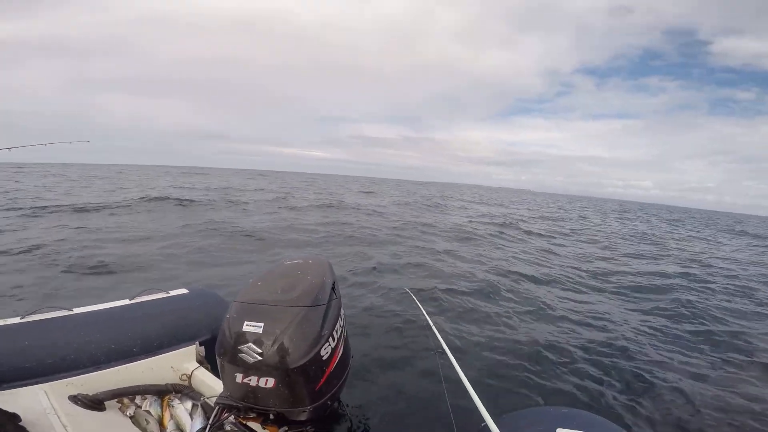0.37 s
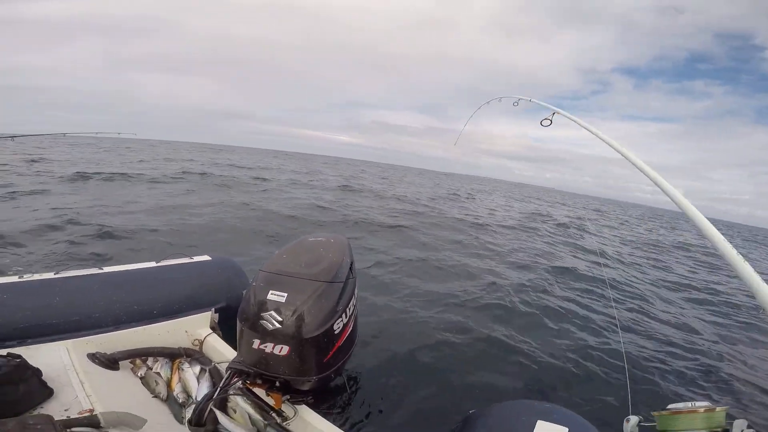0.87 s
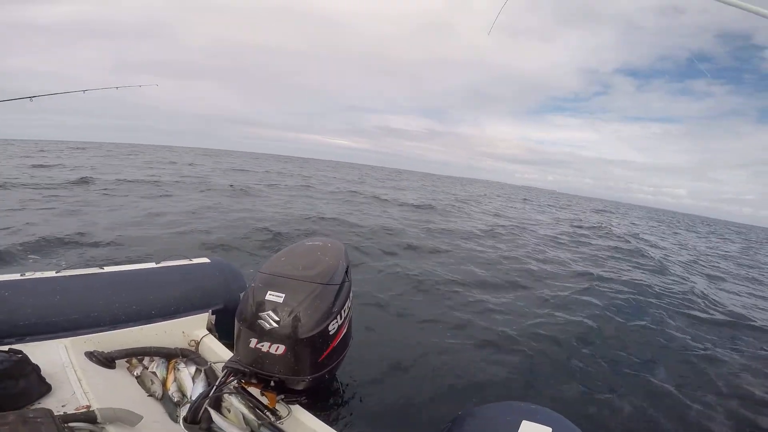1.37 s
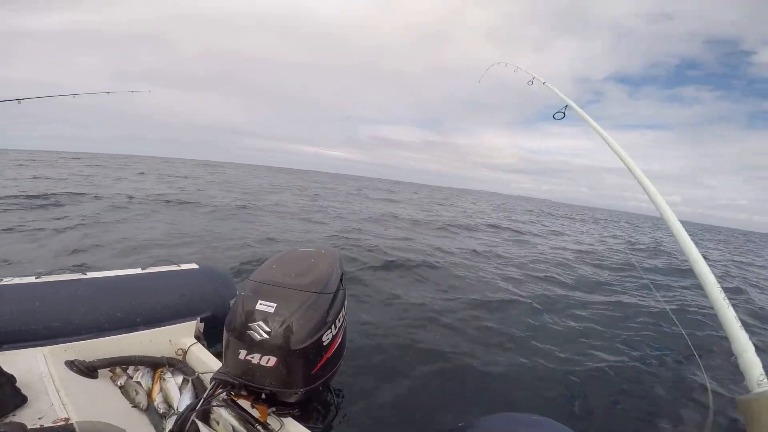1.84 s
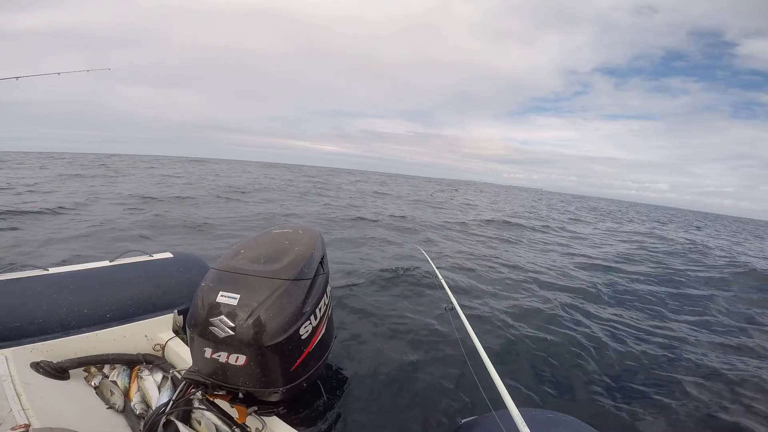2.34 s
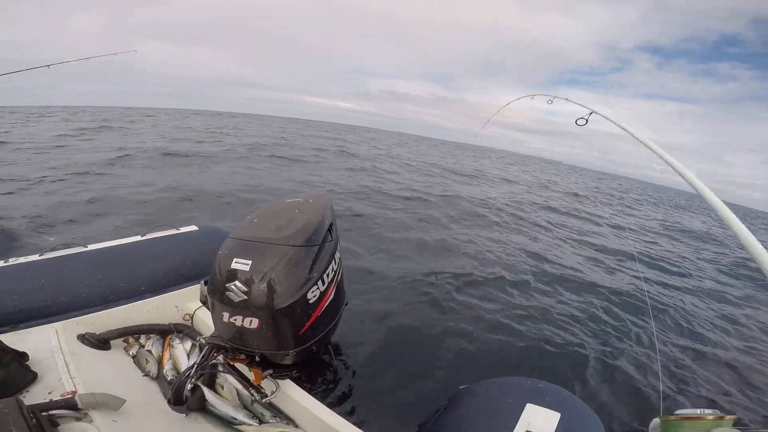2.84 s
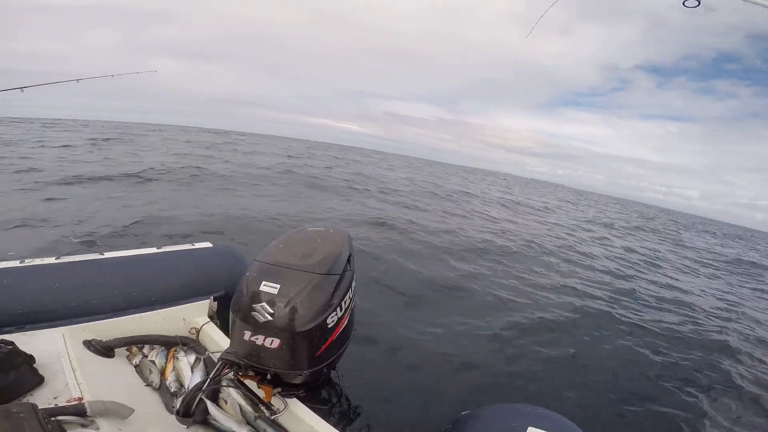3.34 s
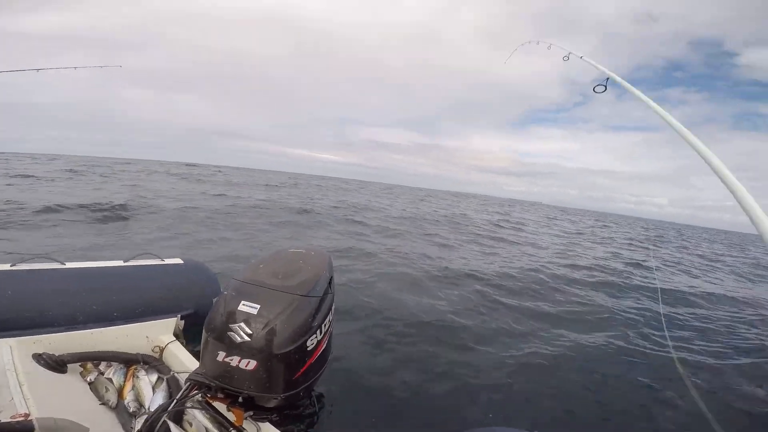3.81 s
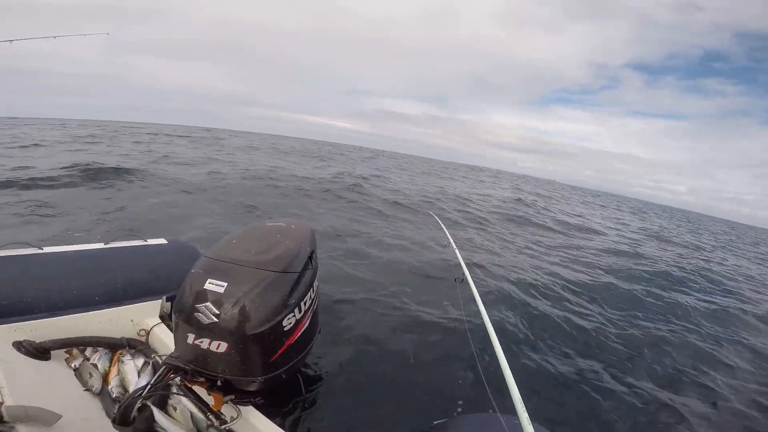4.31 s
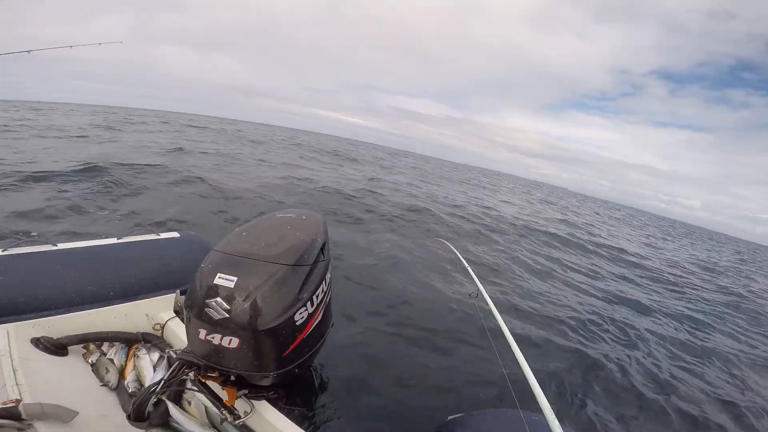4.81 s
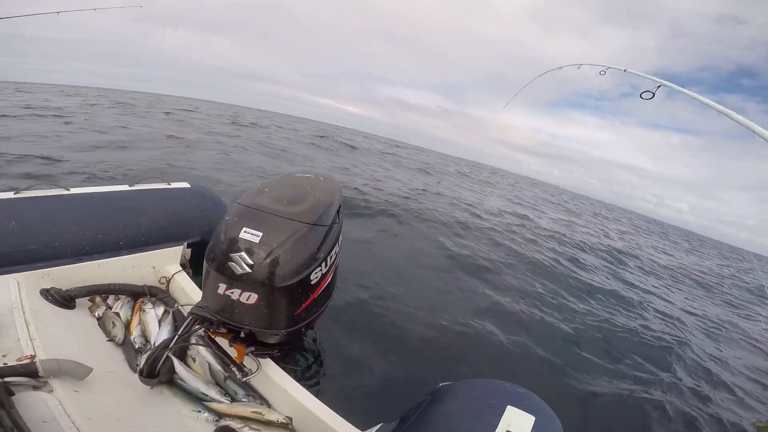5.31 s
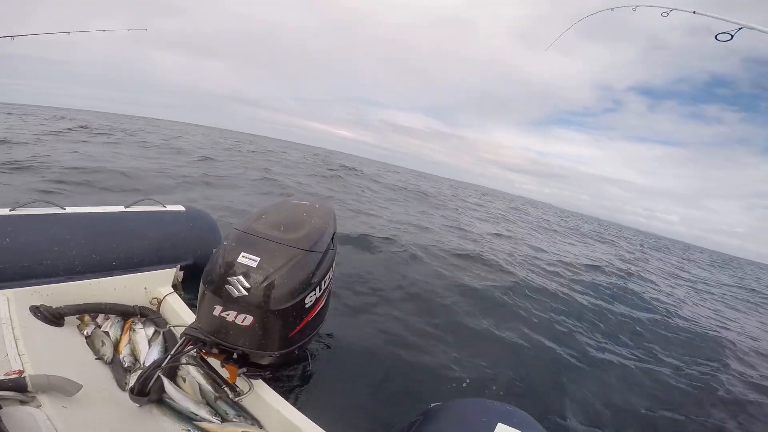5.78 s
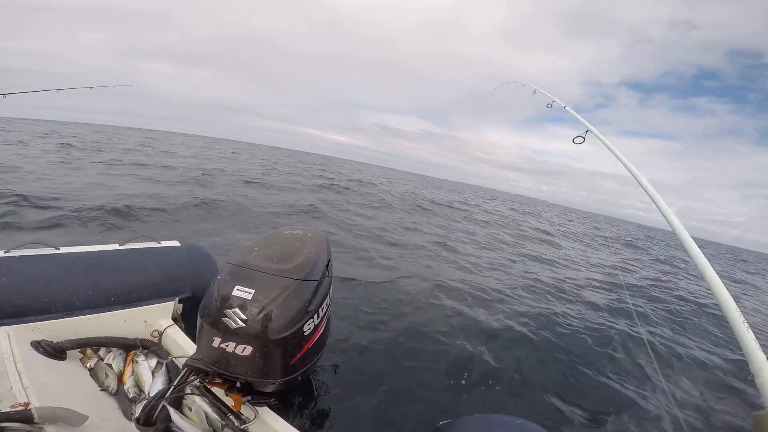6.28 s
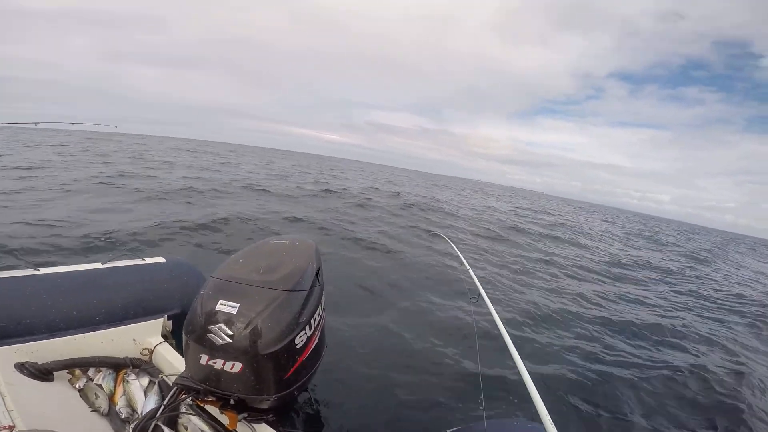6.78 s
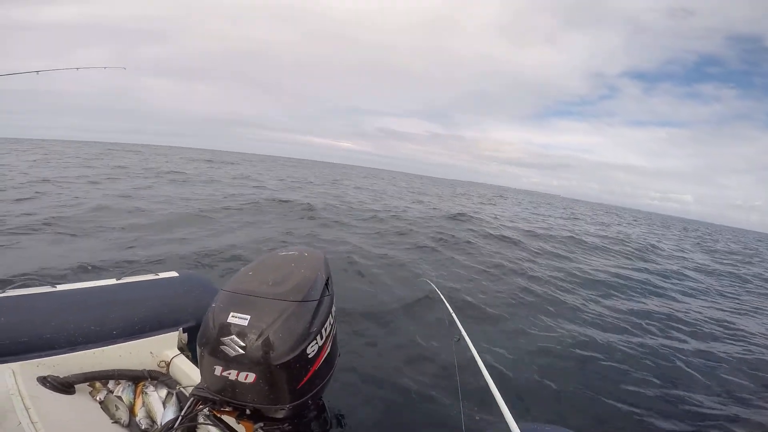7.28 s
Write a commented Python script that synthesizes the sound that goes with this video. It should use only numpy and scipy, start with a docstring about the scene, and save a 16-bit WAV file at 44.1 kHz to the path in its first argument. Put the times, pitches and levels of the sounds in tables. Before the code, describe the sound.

Close, muffled single-channel sound from a small boat at sea. Deep uneven wind throbs dominate, over faint hiss and a very thin high whine. Light water laps and gurgles along the hull. A fishing reel turns in short whirring spells with small squeaks, dull rod and reel knocks, and bright ticks of line and guides. Around four seconds water stirs; just before six a bubbling slap is the liveliest moment, then it calms.

```python
"""Small boat rocking at sea

Wind eddies press on a housed microphone: shaped noise gives a deep throb, a drone and a lumpy flutter.
Water laps, gurgles and sprays along the hull as coloured noise and decaying tones of rising pitch.
A fishing reel wound in short turns is noise through resonances, with warbling squeaks; parts knock and
tick as damped modes. Droplets and reel snap drily; electronics add a steady hiss and faint sine tones."""
import sys
import numpy as np
from scipy import signal
from scipy.fft import rfft, irfft, next_fast_len
from scipy.io import wavfile
from scipy.ndimage import uniform_filter1d, map_coordinates

SR = 44100
rng = np.random.default_rng(int(sys.argv[2]) if len(sys.argv) > 2 else 0)


def invert_db(level):
    """Linear amplitude ratio for a level in decibels (20 dB per decade), elementwise."""
    return 10 ** (np.asarray(level, dtype=float) / 20)


def store_pcm(level_fs):
    """Save levels as 16-bit WAV."""
    pcm = np.round(np.clip(level_fs, -1, 1) * 32767).astype(np.int16)
    wavfile.write(sys.argv[1], SR, np.atleast_2d(pcm).T)


N = 336924  # samples


def unit(x):
    """Normalization of a signal to rms 1."""
    return x / np.sqrt(np.mean(x ** 2) + 1e-20)


def curves(rows):
    """Linear interpolation in time: one value per sample for each column after t."""
    s, *cols = np.transpose(rows)
    return [np.interp(np.arange(N) / SR, s, c) for c in cols]


def wobble(rate):
    """Slow random modulation: a smooth curve through random knots, rate of them per second."""
    knots = rng.standard_normal(int(N * rate / SR) + 4)
    return map_coordinates(knots, [np.arange(N) * rate / SR])


def filtered(x, response):
    """Linear filtering: the spectrum of x times a complex response of frequency."""
    m = next_fast_len(len(x) + 8192)
    return irfft(rfft(x, m) * response(np.fft.rfftfreq(m, 1 / SR)), m)[:len(x)]


def colour(spectrum):
    """Spectral shaping: gain against frequency from (f/Hz, level/dB) points, closed at both ends."""
    hz, db = np.transpose(spectrum)
    return lambda f: invert_db(np.interp(np.log(f + 1), np.log(hz + 1), db, -120, -120))


def octave_band(hz, octaves):
    """Band-pass response, Gaussian in log frequency, with its standard deviation in octaves."""
    return lambda f: np.exp(-.5 * (np.log2((f + 1) / hz) / octaves) ** 2)


def rush(spectrum, patchy_db):
    """Turbulence noise: coloured, rms 1, with random gain in patches of time and frequency."""
    z = signal.stft(rng.standard_normal(N + 512), nperseg=512)[2]
    field = uniform_filter1d(uniform_filter1d(rng.standard_normal(z.shape), 6, 0), 8, 1)
    x = signal.istft(z * invert_db(patchy_db * unit(field)), nperseg=512)[1][:N]
    return unit(filtered(x, colour(spectrum)))


def add(track, s, sound):
    """Superposition of a sound on the track from time s."""
    part = track[max(round(s * SR), 0):][:len(sound)]
    part += sound[:len(part)]


def ring(modes, t):
    """Modal decay: a sum of damped sines, at new strengths for each blow, scaled to peak 1."""
    x = 0
    for hz, db, t60 in modes:
        level_db = db + rng.normal(0, 0.74) - 60 * t / t60
        x = x + invert_db(level_db) * np.sin(2 * np.pi * hz * t)
    return x / np.abs(x).max()


def bubble(hz, t60, t, rise):
    """Bubble resonance: a soft onset, then a decay whose pitch climbs as it nears the surface."""
    onset = 1 - np.exp(-t * hz / 1.1)
    return invert_db(-60 * t / t60) * onset * np.sin(2 * np.pi * hz * t * (1 + rise * t / t60))


def wind():
    """Eddy pressure on the housing: a low-passed throb under a drone and a lumpy flutter."""
    # uneven level of the low wind throb: t/s, level/dB
    throb_levels = [(0.0, -30.5), (0.06, -34.5), (0.13, -62), (0.21, -31), (0.34, -43), (0.36, -38),
                    (0.79, -32), (0.94, -41.5), (1.7, -38.5), (2.04, -22), (2.11, -33.5), (2.23, -24.5),
                    (2.3, -30.5), (2.47, -27), (2.49, -34.5), (3.15, -32.5), (3.21, -42.5), (3.76, -33),
                    (3.87, -24), (4.0, -34), (4.06, -22.5), (4.15, -27.5), (4.21, -23), (4.28, -40),
                    (4.32, -27), (4.53, -32), (4.66, -47.5), (4.83, -31.5), (4.87, -45), (4.89, -35),
                    (6.43, -44), (6.81, -34.5), (6.85, -23.5), (6.89, -46), (6.98, -28), (7.08, -44.5),
                    (7.25, -27.5), (7.34, -54), (7.38, -36.5), (7.55, -44.5), (7.6, -31), (7.64, -44)]
    # lighter eddies: t/s, drone level/dB, flutter level/dB
    eddies = [(0, -37, -57.5), (.1, -48.5, -64), (1.3, -47, -63.5), (1.66, -48.5, -54), (2.02, -41.5, -58),
              (2.3, -41.5, -60.5), (2.68, -48, -59.5), (3.02, -43, -58), (3.59, -46, -64), (3.8, -42, -57),
              (4.32, -43.5, -57), (4.7, -47, -60), (5.4, -48, -61), (5.8, -48, -62.5), (6.2, -46.5, -60),
              (6.47, -49, -64.5), (7.04, -46, -61.5), (7.64, -52, -62)]
    # noise spectra: f/Hz, density/dB per Hz
    throb_spectrum = [(6, -29), (12, -3), (27, 1.5), (42, 2.5), (54, -7), (68, -18.5), (90, -60)]
    drone_spectrum = [(35, -31), (52, -1), (65, -12), (85, -16), (120, -41.5), (150, -48)]
    flutter_spectrum = [(53, -37), (90, -6), (146, -6.5), (248, -12), (476, -25.5), (700, -24.5),
                        (910, -32), (1540, -120)]
    eddy_db, eddies_per_s = 0.5, 12  # random swing of the throb
    throb_db, = curves(throb_levels)
    drone_db, flutter_db = curves(eddies)
    throb = rush(throb_spectrum, patchy_db=0.5)
    running = np.sqrt(np.abs(uniform_filter1d(uniform_filter1d(throb ** 2, 2000), 2000)))
    even = throb / (running + 0.3)  # the noise's own swings are evened out
    throb = invert_db(throb_db) * unit(invert_db(eddy_db * wobble(eddies_per_s)) * even)
    throb = filtered(throb, lambda f: 1 / np.sqrt(1 + (f / 62) ** 10))  # a low-pass keeps the slow throb
    drone = invert_db(drone_db) * rush(drone_spectrum, patchy_db=-1.5)
    lumps = invert_db(1.78 * wobble(13) + 1.4 * wobble(35))
    flutter = unit(lumps * rush(flutter_spectrum, patchy_db=-1.1))
    return throb + drone + invert_db(flutter_db) * flutter


def water():
    """Superposition of lapping, fizz, gurgles and spray."""
    # water along the hull: t/s, lapping level/dB
    laps = [(0.0, -69.5), (0.55, -65), (1.06, -73), (1.53, -73), (1.81, -66.5), (2.26, -63), (2.57, -66),
            (3.04, -68), (3.51, -74.5), (3.74, -67), (3.94, -57), (4.21, -62), (4.85, -67.5), (5.7, -64.5),
            (5.85, -53.5), (6.0, -60), (6.38, -67), (7.08, -65), (7.64, -76)]
    lap_db, = curves(laps)
    near = np.zeros(N)
    gurgles(near)
    spray(near)
    return lapping(lap_db) + fizz(lap_db) + near


def lapping(lap_db):
    """Turbulent wash: coloured noise joined by a dense swarm of small bubble resonances."""
    # spectrum of the noise: f/Hz, density/dB per Hz
    spectrum = [(300, 8.5), (600, -5.5), (1000, 3), (1500, 4), (2500, -1), (5000, -24), (9000, -28),
                (14000, -48)]
    swarm, t = np.zeros(N), np.arange(2600) / SR
    for when, pitch, size in rng.random((1800, 3)):
        hz = 1200 * 3.6 ** pitch
        strength = (1.015 - size) ** -.26  # a few are much louder
        add(swarm, when * N / SR, strength * bubble(hz, 48 / hz, t, rise=0.13))
    even = unit(invert_db(1.8 * wobble(30)) * rush(spectrum, patchy_db=1.3))
    return invert_db(lap_db) * (invert_db(-2.5) * even + invert_db(-4.5) * unit(swarm))


def fizz(lap_db):
    """Amplitude-modulated noise: fine crackling that follows the lapping and the wound line."""
    # spectrum: f/Hz, density/dB per Hz
    spectrum = [(3500, -20), (5000, 0), (7000, 1), (10000, -1.5), (13000, -9), (15000, -44)]
    quiet_fizz_db, quiet_lap_db, grows = -79, -70.5, 0.5  # grows in dB per dB of lapping
    shed_db = -22  # spray flung off the wound line, under the winding level
    fizz_db = quiet_fizz_db + grows * (lap_db - quiet_lap_db)
    crackle = rng.standard_normal(N) * invert_db(3 * wobble(300) + 2.8 * wobble(35))
    level = np.hypot(invert_db(fizz_db), invert_db(winding() + shed_db))
    return level * unit(filtered(crackle, colour(spectrum)))


def gurgles(track):
    """Bubble resonance in torn water: the loudest single bubbles, each in a decaying noise band."""
    # bubbles: t/s, level before the swell and fade/dB, f/Hz
    bubbles = [(.621, -51, 1030), (0.638, -48, 1650), (0.646, -49, 1080), (.647, -49, 6150),
               (.649, -49, 2000), (.654, -50, 2550), (0.666, -46, 1850), (.662, -53, 1260),
               (.871, -51, 3600), (0.876, -50, 1190), (0.921, -51, 1790), (.949, -44.5, 1960),
               (1.074, -50.5, 1760), (1.563, -51, 1430), (1.726, -49.5, 2340), (1.968, -48, 6100),
               (2.003, -50, 6000), (2.035, -54, 5860), (2.05, -46, 1490), (3.222, -55, 1370),
               (3.253, -53, 2330), (3.335, -46.5, 1310), (3.762, -50, 6300), (2.669, -57, 2040),
               (3.872, -46, 3480), (4.124, -43, 1850), (4.14, -45, 3200), (4.398, -55, 1440),
               (4.545, -53, 1400), (4.637, -53, 2050), (4.646, -46, 1780), (4.798, -51, 1410),
               (5.269, -52, 2300), (5.4, -51, 1690), (5.463, -47, 1765), (5.643, -42, 1620),
               (5.715, -46, 2200), (5.715, -50, 1660), (5.765, -44, 1650), (5.773, -42, 2400),
               (5.786, -44, 3880), (5.812, -55, 3600), (5.824, -46.5, 1720), (5.845, -38, 1170),
               (5.846, -42, 1590), (5.859, -47, 1060), (5.916, -37.5, 1495), (5.934, -43, 1100),
               (5.964, -44, 1220), (5.965, -45, 370), (5.99, -45, 423), (6.018, -48, 330),
               (6.022, -41, 1340), (6.114, -43, 775), (6.292, -54, 2900), (6.466, -51, 1430),
               (6.531, -51, 1050), (6.634, -50, 1630), (6.668, -50, 1730), (6.72, -49, 3680),
               (7.527, -53, 2330)]
    longest_s, cycles = 0.052, 79  # time scale of the decay; small bubbles take this many cycles
    hold = 0.15  # share of the time scale in which the bubble swells slightly before it fades
    splat_db, splat_octaves = -13, .35  # torn water around each bubble
    t = np.arange(SR // 10) / SR
    for s, db, hz in bubbles:
        # churning water breaks up the ring
        ragged = invert_db(np.interp(t, t[::110], rng.normal(0, 1.2, len(t[::110]))))
        t60 = min(longest_s, cycles / hz)
        swell_db = 138 * np.minimum(t / t60, hold) - 60 * t / t60 - 60 * hold
        tone = ragged * invert_db(swell_db) * bubble(hz, t60, t, rise=0.047)
        splat = unit(filtered(rng.standard_normal(len(t)), octave_band(hz, splat_octaves)))
        add(track, s, invert_db(db) * (tone + invert_db(splat_db - 60 * t / t60) * splat))


def spray(track):
    """Random superposition: bursts of band noise and droplets of many pitches."""
    # bursts: t of the crest/s, level at the crest/dB, centre f/Hz, length of the fall/s
    bursts = [(0.619, -56, 1310, 0.012), (0.653, -58, 1500, 0.014), (.662, -59, 3400, 0.014),
              (0.623, -60, 3300, .006), (0.726, -59, 1020, 0.0065), (0.925, -59, 2590, 0.0054),
              (1.833, -77, 6900, 0.036), (2.058, -66.5, 7560, .04), (2.13, -67, 6000, .008),
              (2.277, -59, 2520, 0.0033), (2.994, -57, 1620, 0.0052), (3.842, -74, 5970, .015),
              (3.927, -60.5, 7760, .004), (3.955, -65, 5600, 0.0043), (3.995, -64, 5470, 0.0068),
              (4.066, -57, 4200, 0.0071), (4.1, -68, 8000, 0.027), (4.219, -65, 5800, .006),
              (3.032, -62, 824, 0.033), (4.124, -53.5, 3000, 0.012), (4.176, -54, 3020, 0.0084),
              (4.446, -56.5, 2440, 0.0075), (5.158, -61, 5070, 0.0067), (5.188, -58, 5570, 0.0043),
              (5.2, -55, 9800, 0.014), (5.21, -54, 6000, 0.01), (5.422, -57, 2860, 0.011),
              (5.718, -59, 3050, 0.0035), (5.8, -52.5, 5930, 0.0048), (5.852, -64, 10000, 0.0018),
              (5.762, -63, 6500, 0.0046), (5.679, -55, 6100, .003), (5.808, -57, 1460, 0.013),
              (5.863, -49, 1980, 0.0056), (5.939, -50, 2400, 0.0076), (5.961, -56, 4000, 0.0039),
              (5.865, -56, 1500, 0.018), (5.88, -57, 925, .01), (6.654, -66, 1660, 0.018),
              (6.09, -55.5, 3730, 0.007), (6.346, -65, 520, 0.028)]
    widest_hz, widest_octaves, narrows = 1500, 0.817, 0.217  # narrows in octaves per octave away
    t, drop_t = np.arange(-SR // 5, SR // 5) / SR, np.arange(900) / SR
    for s, db, hz, length in bursts:
        octaves = widest_octaves - narrows * abs(np.log2(hz / widest_hz))
        bell = octave_band(hz, octaves)
        noise = filtered(rng.standard_normal(len(t)), lambda f: bell(f) / (1 + (f / 13000) ** 8))
        drops = np.zeros(len(t))
        for when, size, pitch in zip(*rng.random((2, 200)), rng.standard_normal(200)):
            drop_hz = min(hz * 2 ** (octaves * pitch), 13000)
            drop = (1 - size) ** -.12 * bubble(drop_hz, 30 / drop_hz, drop_t, rise=0.17)
            add(drops, when * len(t) / SR, drop)
        burst = unit(noise) + 1.1 * unit(drops)
        spread = np.where(t < 0, 0.5 * length, length)  # quick to come, slower to go
        add(track, s + t[0], invert_db(db) * np.exp(-.5 * (t / spread) ** 2) * unit(burst))


def snaps():
    """Heavily damped resonance: short dry snaps of droplets and chattering reel."""
    # snaps: t/s, level before the soft onset/dB, f/Hz
    clicks = [(.632, -54, 2100), (.655, -56, 1500), (.672, -53, 2300), (3.897, -46, 2300),
              (4.019, -56, 3900), (4.2983, -37.5, 2630), (4.448, -41, 3380), (5.186, -54, 5600),
              (5.257, -56, 4000), (5.6652, -31, 2190), (5.666, -42, 1500), (5.659, -52, 4200),
              (5.667, -54, 4200), (5.711, -56, 4150), (5.722, -53, 4200), (5.734, -47, 1960),
              (5.838, -52, 2200), (5.872, -38, 1590), (5.895, -58, 1900), (5.972, -46, 2400),
              (6.09, -43, 1560), (6.13, -49, 1800), (6.515, -39, 3520), (6.524, -41, 3500),
              (6.533, -46, 3500), (6.543, -54, 3450)]
    out, t = np.zeros(N), np.arange(SR // 10) / SR
    for s, db, hz in clicks:
        add(out, s, invert_db(db) * bubble(hz, 23 / hz, t, rise=0.028))  # 60 dB down in 23 cycles
    return out


def reel():
    """Friction-driven resonance: gears rub unevenly into the reel's modes, with squeaks."""
    # resonances of the turning reel: f/Hz, width/Hz, drive level/dB
    resonances = [(1430, 62, -1), (1760, 200, 1.5), (2400, 100, 0.5), (2900, 92, 3), (3754, 310, 0.5),
                  (4186, 240, -0.5), (5470, 200, -7), (6450, 260, -12)]
    out = np.zeros(N)
    for c, w, db in resonances:  # each sings out in its own turn
        rub = rng.standard_normal(N) * invert_db(db + 2.4 * wobble(90) + 2.6 * wobble(14))
        add(out, 0, filtered(rub, lambda f: 1j * f * w / (c * c - f * f + 1j * f * w)))
    out = invert_db(winding()) * unit(out)
    squeaks(out)
    return out


def winding():
    """Addition of powers: level of the reel in dB as each spell spins up, holds, drops and coasts."""
    # spells of winding: t at full level/s, hold/s, level/dB
    turns = [(0, 0.86, -72.5), (1.66, 0.21, -65), (1.947, 0.22, -64.5), (3.756, 0.14, -65.5),
             (3.885, 0.25, -61.5), (4.22, 0.092, -70), (5.25, 0.16, -68), (5.655, 0.12, -76),
             (5.804, 0.016, -60.5), (6.097, 0.28, -66.5), (6.437, 0.13, -63.5), (7.228, 0.06, -63.5)]
    spin_up, run_down = 117, 86  # dB per s
    coast_db, coast_fall = -4.5, 11  # after a quick drop the spool coasts; fall in dB per s
    t, power = np.arange(N) / SR, np.zeros(N)
    for s, hold, db in turns:
        after = np.maximum(t - s - hold, 0)
        fade_db = np.maximum(-run_down * after, coast_db - coast_fall * after)
        rise_db = -spin_up * np.maximum(s - t, 0)
        power += invert_db(2 * (db + fade_db + rise_db))
    return 10 * np.log10(power)


def squeaks(track):
    """Stick-slip tones: frequency and amplitude modulation at the gear-tooth rate."""
    # squeaks: t/s, level before modulation/dB, f/Hz, length/s, peak warble/Hz
    tones = [(1.828, -54, 2940, 0.038, 14), (1.96, -56, 3920, 0.12, 300), (2.266, -61, 2820, 0.028, 20),
             (3.774, -52, 2920, 0.046, 39), (5.211, -55, 3810, 0.018, 23), (5.691, -57, 4020, 0.016, 20),
             (6.401, -64, 2900, 0.044, 20), (6.515, -54, 2400, 0.03, 24)]
    tooth_hz = 30
    t = np.arange(SR // 5) / SR
    teeth = 2 * np.pi * tooth_hz * t  # pitch and strength swing together as the gear teeth pass
    for s, db, hz, length, warble_hz in tones:
        drift = np.cumsum(rng.normal(0, .045, len(t)))  # an unsteady phase blurs the tone
        phase = 2 * np.pi * hz * t + warble_hz / tooth_hz * np.sin(teeth) + drift
        # the rubbing grips and slips
        slips_db = np.interp(t, t[::130], rng.normal(0, 3, len(t[::130])))
        strength = invert_db(db + slips_db + 3.9 * np.cos(teeth - .5))
        arch = np.sin(np.pi * np.clip(t / length, 0, 1))
        add(track, s, strength * arch * np.sin(phase))


def contacts():
    """Impact excitation of modes in the reel, the rod, the line and its guides."""
    out = np.zeros(N)
    knocks(out)
    ticks(out)
    return out


def knocks(track):
    """Padded impact: dull knocks ring the reel body over a short broad thud."""
    # knocks of reel and rod: t/s, ring level/dB, thud over ring/dB
    blows = [(0.1878, -47.5, -5), (0.207, -52, 13), (0.3934, -66, 21), (1.8718, -51, 0), (1.929, -46.5, -4),
             (2.0884, -39, 3), (2.0993, -38, 7.5), (2.2018, -46.5, -7), (2.332, -47.5, -1),
             (2.5864, -59, 22), (2.6188, -45, 0), (2.6286, -41.5, 6), (2.9722, -51, 4.5),
             (3.9624, -44.5, -0.5), (3.995, -60, 16), (4.098, -44.5, 2), (4.3341, -43, 4),
             (4.3424, -45, 12), (4.592, -64, 26), (6.451, -50, 3), (6.6553, -49.5, 3), (7.574, -64, 17)]
    # modes: f/Hz, relative level/dB, t60/s
    ring_modes = [(2270, 2.5, 0.036), (2400, 18, 0.037)]
    thud_modes = [(255, -2, 0.05), (520, 1, .012), (800, 4, 0.012), (1050, 5, 0.014), (1450, 2, 0.011),
                  (1800, -2, 0.01)]
    t = np.arange(SR // 12) / SR
    soft = 1 - np.exp(-t / 0.000063)  # a padded contact dulls the click
    push = -.9 * (t / 0.00027) * np.exp(1 - t / 0.00013)  # the contact itself, one short inward push
    for s, db, thud_db in blows:
        puff = unit(filtered(rng.standard_normal(len(t)), lambda f: 1 / (1 + (f / 2500) ** 4)))
        thud = ring(thud_modes, t) + 0.3 * invert_db(-60 * t / 0.015) * puff
        add(track, s, invert_db(db) * (soft * ring(ring_modes, t) + invert_db(thud_db) * (soft * thud + push)))


def ticks(track):
    """Hard impact: bright ticks of line and guides ring small parts with a noisy crack."""
    # ticks: t/s, level of the middle modes/dB, low mode over it/dB, top modes over it/dB
    blows = [(0.739, -44.5, -19, 0), (0.92, -44.5, -13, -2), (1.6246, -57, -2, 5), (2.291, -52, -2, 3),
             (2.3544, -59, -5, 5), (2.606, -45.5, -10, -6), (2.6593, -49.5, -4, -5), (2.798, -50, -8, -3.5),
             (2.9282, -52, -8, 0), (3.442, -56.5, -1, 2), (4.59, -49.5, -11, 2.5), (4.781, -46.5, -14, -4),
             (4.907, -49, -3, 0), (4.9926, -49.5, -3, -1), (5.1, -49.5, 0.5, 1), (5.1522, -58, -13, -8),
             (5.3052, -52.5, 5, 1), (5.668, -51, -4, -3), (5.734, -49.5, -2, 1), (5.798, -44, -4, -18),
             (5.881, -61.5, -9, 15.5), (7.156, -55.5, -2, 6), (7.2498, -56, -4, 7), (7.4183, -49, -20, 4)]
    # modes: f/Hz, relative level/dB, t60/s
    low_modes = [(4320, 0, 0.027)]
    mid_modes = [(5560, 8.5, 0.017), (6180, 1, 0.017)]
    top_modes = [(7940, 15.5, 0.011), (9400, 15, 0.012), (11080, 18.5, 0.011), (12900, -22, 0.0074)]
    t = np.arange(SR // 12) / SR
    for s, db, low_db, top_db in blows:
        crack = 0.27 * invert_db(-60 * t / 0.016) * np.diff(rng.standard_normal(len(t) + 1))
        top = invert_db(top_db) * (ring(top_modes, t) + crack)
        add(track, s, invert_db(db) * (ring(mid_modes, t) + invert_db(low_db) * ring(low_modes, t) + top))


def electronics():
    """Stationary background: microphone hiss as coloured noise and steady thin sine tones."""
    # hiss spectrum: f/Hz, density/dB per Hz
    hiss_spectrum = [(240, -45), (400, -0.5), (542, -1), (1480, -6), (2410, -4.5), (4630, -8), (5500, -8),
                     (6800, -12), (11400, -17), (13500, -14), (14800, -32), (15300, -17)]
    # whine: f/Hz, rms level/dB
    tones = [(5486, -89), (6293, -84), (6325, -83.5), (12618, -85)]
    t = np.arange(N) / SR
    whine = np.zeros(N)
    for hz, db in tones:
        whine += invert_db(db) * np.sqrt(2) * np.sin(2 * np.pi * (hz * t + rng.random()))
    return invert_db(-66.5) * rush(hiss_spectrum, patchy_db=1.5) + whine


def scene():
    """Superposition of all sources on one channel."""
    return (wind() + water() + snaps() + reel() + contacts() + electronics())[None]


def band_limit(x):
    """A steep low-pass at the top of the band."""
    return signal.sosfilt(signal.butter(12, 15330, fs=SR, output="sos"), x)


def record(dry):
    """The finished mix as it is heard."""
    return band_limit(dry)


dry = scene()
out = record(dry)
store_pcm(out)
```